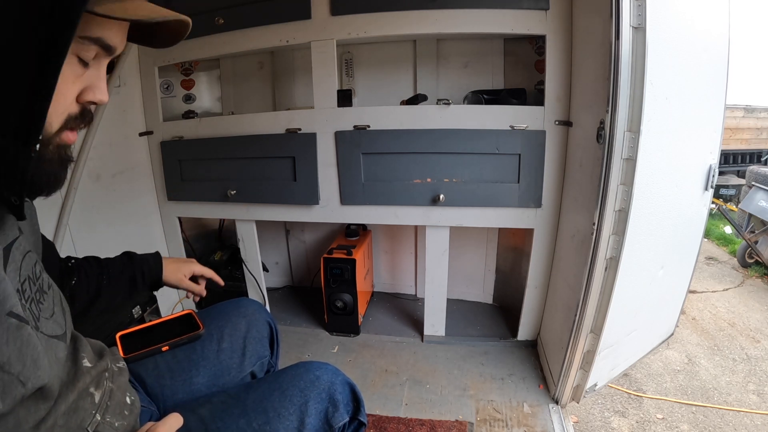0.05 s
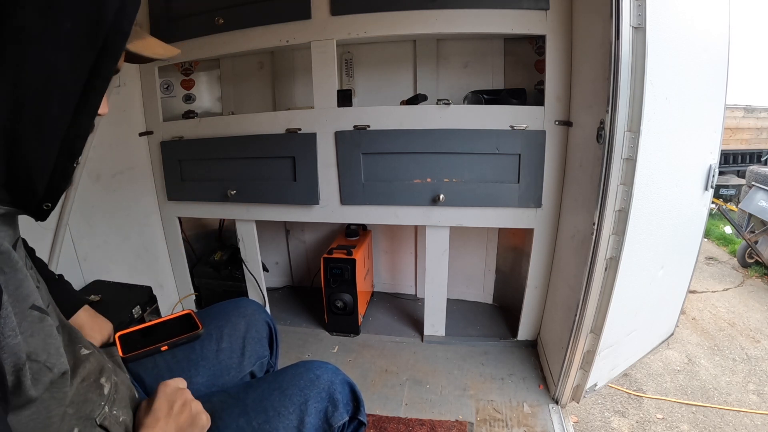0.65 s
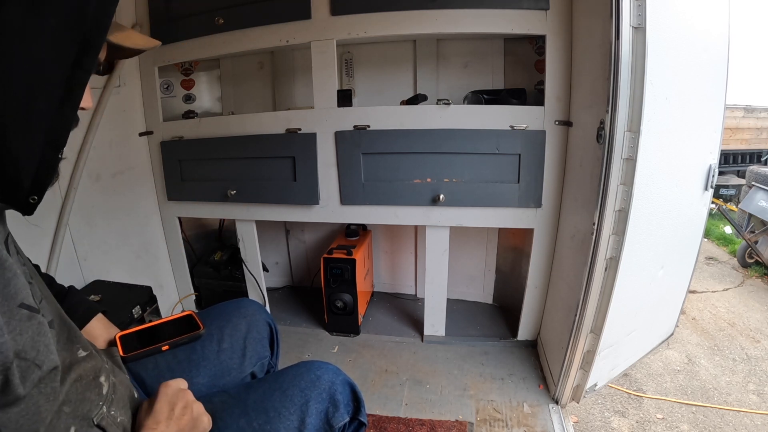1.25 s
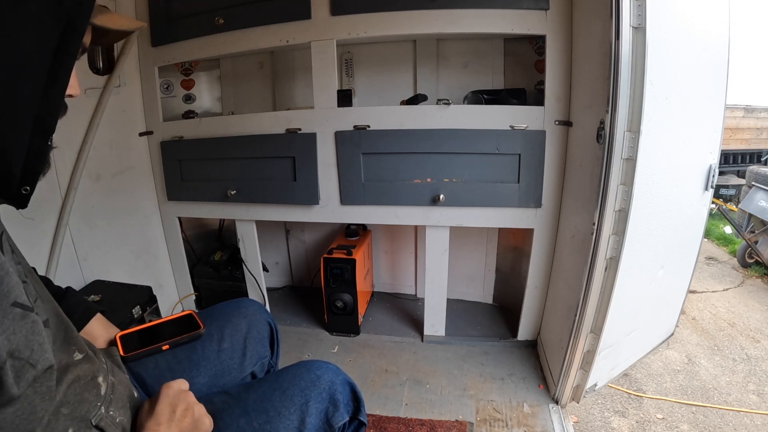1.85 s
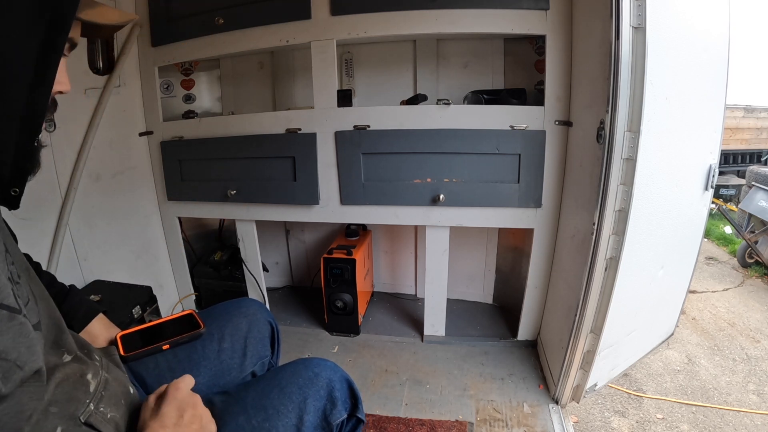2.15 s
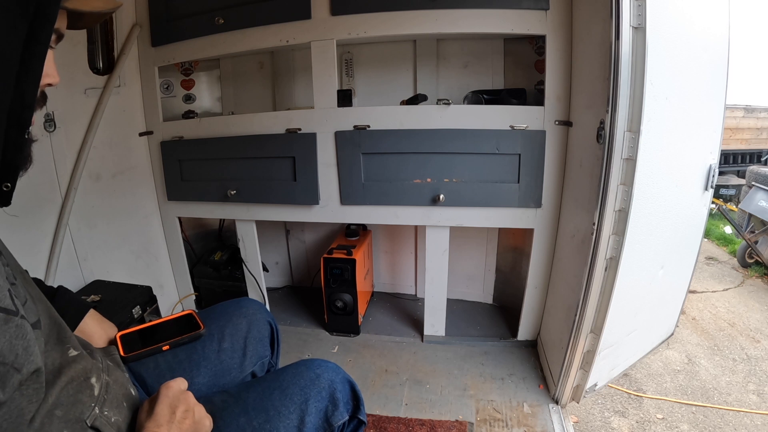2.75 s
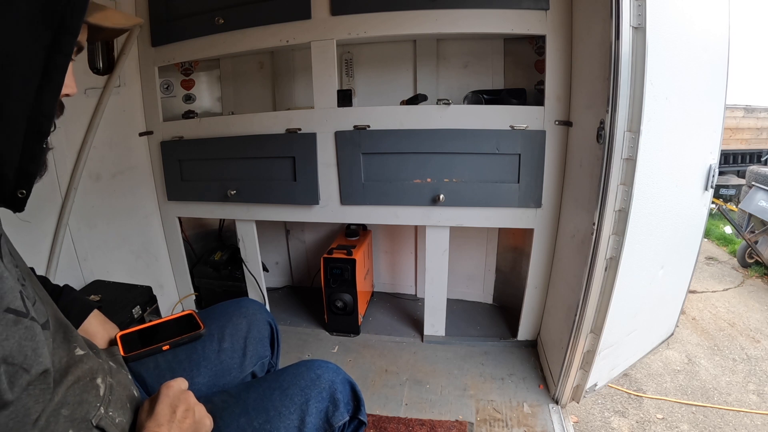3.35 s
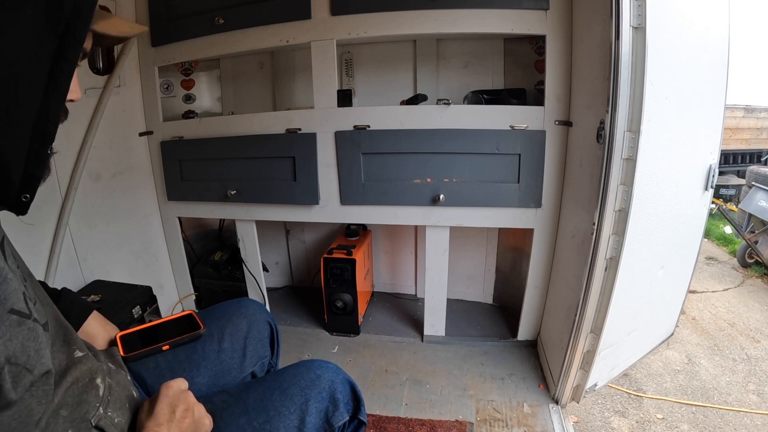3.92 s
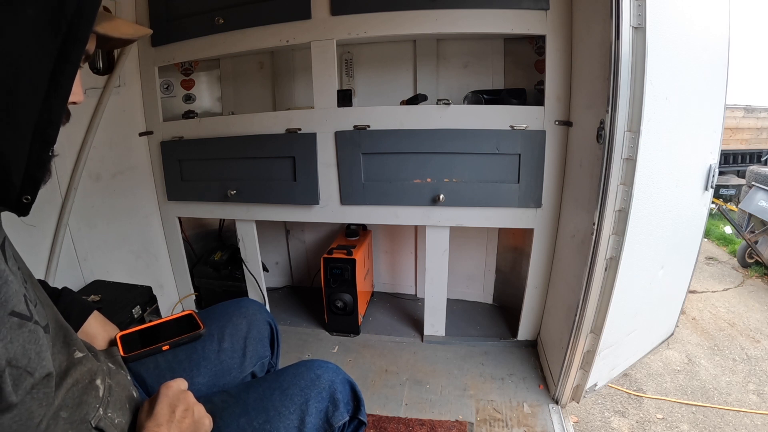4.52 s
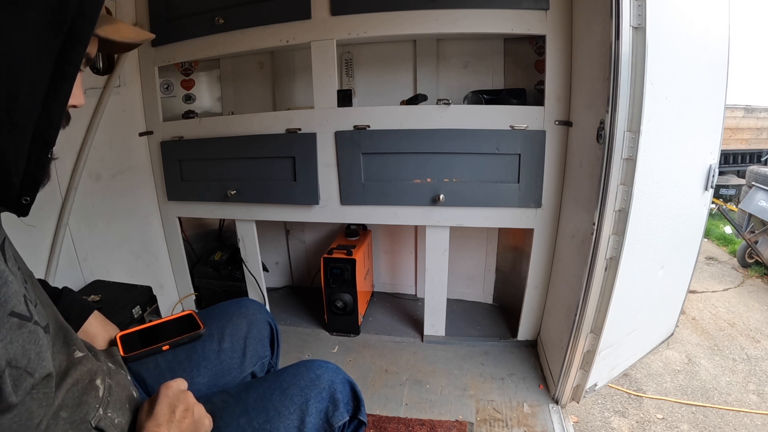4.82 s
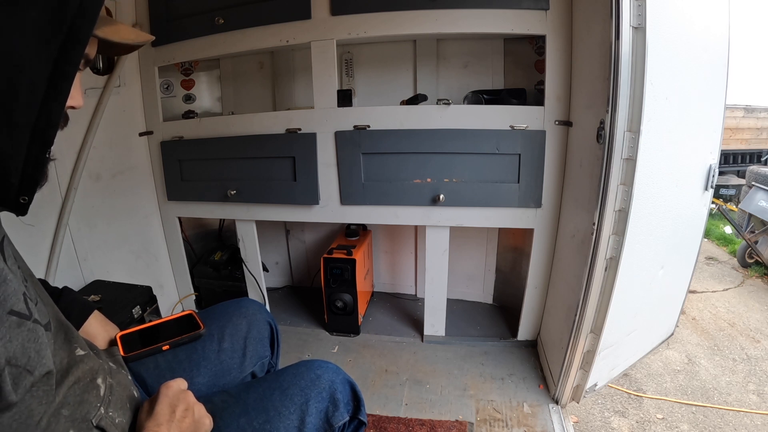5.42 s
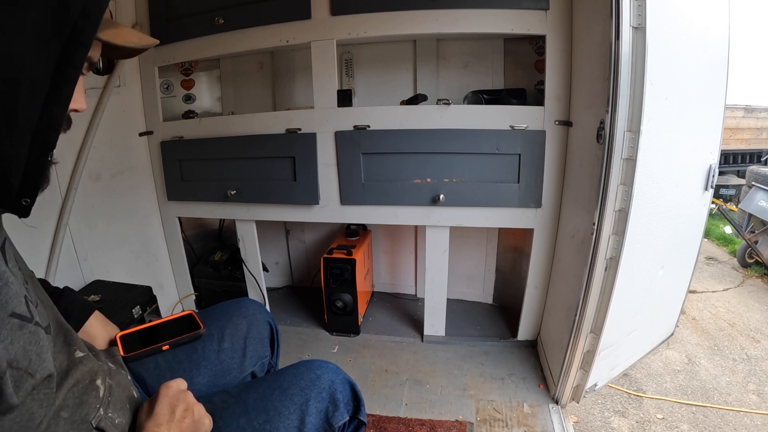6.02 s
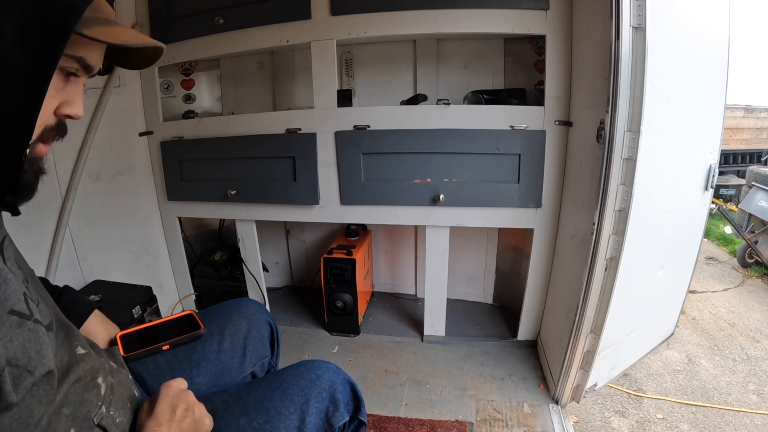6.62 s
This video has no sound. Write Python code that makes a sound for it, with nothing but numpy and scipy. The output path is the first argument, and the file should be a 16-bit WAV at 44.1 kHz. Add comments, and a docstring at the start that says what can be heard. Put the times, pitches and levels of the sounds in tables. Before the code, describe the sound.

Inside a small trailer, close to the microphone, a heater's fuel pump knocks in an even rhythm, each stroke a pair of metallic clicks with a short, boxy ring. Cloth rustles briefly, the knocks firm up a little, and a seated person makes a soft bump. The pace drops midway, another bump follows, and low outdoor rumble grows. A quiet fan and a very faint whine run throughout.

```python
"""The metering fuel pump of a diesel heater ticks through start-up on the floor of an enclosed trailer.
A faint tone dies away and the ticks begin over fan air, thin power-supply whine and outdoor rumble.
Each tick is two blows, the plunger pulling in and springing back: steel clacks, floor and walls boom.
A sleeve rustles, the blows firm up as the fuel line fills, and a seated person shifts with a soft bump.
Halfway the ticking slows; a second bump follows, and then the rumble swells."""
import sys
import numpy as np
from scipy import signal
from scipy.fft import rfft, irfft, next_fast_len
from scipy.io import wavfile
from scipy.ndimage import map_coordinates

SR = 44100
rng = np.random.default_rng(int(sys.argv[2]) if len(sys.argv) > 2 else 0)


def inscribe(sig):
    """Save sig as 16-bit PCM at rate SR to the path in sys.argv[1].

    A 1-D sig is mono; a 2-D sig holds one channel per row.
    Samples are clipped to [-1, 1] before scaling.
    """
    pcm = np.round(np.clip(np.atleast_2d(sig).T, -1, 1) * 32767)
    wavfile.write(sys.argv[1], SR, pcm.astype(np.int16))


N = 294147

# modes of heater case, floor and cabin: pitch_hz, pull_in_db, spring_back_db, t60_s (capped in boom)
BODY_MODES = [(98, -61.5, -53, 0.62), (127.15, -53, -78, 0.92), (144, -56.4, -65.5, 0.74),
              (165.4, -53, -76, 0.83), (185.2, -59.5, -71.5, 0.78), (196.3, -44, -71, 0.39),
              (210.46, -37, -34, 0.36), (236.2, -47.5, -43.5, 0.22), (250.9, -48.5, -47, 0.42),
              (286, -65, -65, 0.16), (305.8, -39.5, -36, 0.38), (308.8, -31.5, -33, 0.14),
              (341.3, -37, -60, 0.08), (344.5, -38.5, -32.5, 0.17), (378, -52.5, -42, 0.24),
              (407.1, -42.5, -44, 0.23), (425.2, -32, -68, 0.26), (425.6, -34, -44, 0.53),
              (456.4, -52, -45.5, 0.25), (489.7, -48, -48, 0.44), (533, -46, -45, 0.24),
              (554.2, -39.5, -37, 0.11), (564.9, -44.5, -50, 0.22), (604.8, -46, -59, 0.25),
              (623, -45.5, -54, 0.12), (667.6, -54.5, -52.5, 1), (682, -74, -60.5, 0.48)]


def amp(db):
    """Decibels to gain."""
    return 10 ** (np.asarray(db) / 20)


def unit(x):
    """Scale to rms 1."""
    return x / np.sqrt(np.mean(x ** 2) + 1e-20)


def along(points, hz):
    """(Hz, value) points on a log axis."""
    f, v = np.transpose(points)
    return np.interp(np.log(hz + 1), np.log(f + 1), v)


def curves(rows):
    """One value per sample for each column after the time."""
    s, *cols = np.transpose(rows)
    return [np.interp(np.arange(N) / SR, s, c) for c in cols]


def wobble(rate):
    """A smooth random curve, rate knots a second."""
    knots = rng.standard_normal(int(N * rate / SR) + 4)
    coarse = np.arange(0, N, 32)
    return np.interp(np.arange(N), coarse, map_coordinates(knots, [coarse * rate / SR]))


def filtered(x, response):
    """x times a complex response of frequency."""
    n = x.shape[-1]
    m = next_fast_len(n + SR // 4)
    return irfft(rfft(x, m) * response(np.fft.rfftfreq(m, 1 / SR)), m)[..., :n]


def causal(x, gain):
    """Colour x by a gain of frequency, with nothing ahead of the attack."""
    size = 2 ** 16
    cep = irfft(np.log(np.maximum(gain(np.fft.rfftfreq(size, 1 / SR)), 1e-6)))
    fold = 1 + np.sign(size // 2 - np.arange(size))
    fold[0] = 1
    return irfft(rfft(x, size) * np.exp(rfft(cep * fold)))[..., :x.shape[-1]]


def stereo_noise(n, alike):
    """White noise whose two channels agree as much as alike says."""
    turn = lambda hz: np.arccos(np.clip(along(alike, hz), -1, 1)) / 2
    mid, side = filtered(rng.standard_normal((2, n)),
                         lambda hz: np.array([np.cos(turn(hz)), np.sin(turn(hz))]))
    return np.array([mid + side, mid - side])


def rush(spectrum, alike):
    """Coloured stereo noise of rms 1."""
    return unit(filtered(stereo_noise(N, alike), lambda hz: amp(along(spectrum, hz))))


def add(track, s, sound):
    """Mix a sound into the track at time s."""
    part = track[:, max(round(s * SR), 0):][:, :sound.shape[-1]]
    part += sound[:, :part.shape[-1]]


def pump(clack_db=-31.5, boom_db=0.45, rattle=0.29, stroke_s=.05377, jitter_s=.0002, vary_db=.5):
    """The plunger pulls in and springs back: each blow is a steel clack over a low boom."""
    # the softer spring-back against the pull-in: freq_hz, gain_db
    softer = [(700, -2.5), (1500, -5.5), (2800, -4), (4500, -11.5), (7000, -15), (12000, -15)]
    strokes = ticks()
    _, pull_db, back_db, _ = np.transpose(BODY_MODES)
    pull_boom = boom(pull_db)
    back_boom = rocking(pull_boom.shape[-1]) - boom(back_db)  # the return kicks the case the other way
    pull_paths, back_paths = scatter(), scatter()  # the same at every tick, plus fresh rattle
    t = np.arange(back_paths.shape[-1]) / SR
    cushion = 1 - np.exp(-t / 0.00046)  # fuel brakes the returning plunger
    pulls = np.array([pull_paths + rattle * scatter() for _ in strokes])
    backs = np.array([cushion * (back_paths + rattle * scatter()) for _ in strokes])
    pulls = causal(pulls, clack_colour)
    backs = causal(backs, lambda hz: clack_colour(hz) * amp(along(softer, hz)))
    out = np.zeros((2, N))
    luck = rng.standard_normal((len(strokes), 2))
    for (s, low_db, high_db), (late, harder), pull, back in zip(strokes, luck, pulls, backs):
        back_s = s + stroke_s + jitter_s * late
        spring_db = vary_db * harder
        add(out, s, amp(high_db + clack_db) * pull)
        add(out, s, amp(low_db + boom_db) * pull_boom)
        add(out, back_s, amp(high_db + clack_db + spring_db) * back)
        add(out, back_s, amp(low_db + boom_db + spring_db) * back_boom)
    return out


def ticks(first_s=.0671, fill_s=1.75, empty_boom_db=-2.5, empty_clack_db=-1.5):
    """Strokes firm up as the fuel line fills. Rows of start_s, boom_gain_db, clack_gain_db."""
    # the controller steps the pump's pace: period_s, stroke_count
    pace = [(.3938, 9), (.5252, 2), (.4937, 2), (.4639, 2)]
    period_s, count = np.transpose(pace)
    start_s = first_s + np.append(0, np.cumsum(np.repeat(period_s, count.astype(int))))
    empty = np.clip(1 - start_s / fill_s, 0, 1)
    return np.column_stack([start_s, empty_boom_db * empty, empty_clack_db * empty])


def boom(levels_db, attack_s=0.00054, spread=0.22, life_cycles=180):
    """One blow rings case, floor and cabin; the walls echo it, and left and right differ in phase."""
    # echoes off the side and end walls: delay_s, gain
    walls = [(.01842, -.49), (.04113, .45)]
    t = np.arange(SR * 3 // 4) / SR
    hz, _, _, t60 = np.transpose(BODY_MODES)[:, :, None]
    t60 = np.minimum(t60, life_cycles / hz)  # plywood damps every mode within so many cycles
    sign = (-1) ** np.arange(len(hz))[:, None]  # neighbouring modes swing opposite ways
    fade = sign * amp(levels_db[:, None] - 60 * t / t60) * (1 - np.exp(-t / attack_s))
    ring = np.sum(fade * np.sin(2 * np.pi * hz * t), axis=0)
    mid = filtered(ring, lambda f: 1 + sum(gain * np.exp(-2j * np.pi * f * s) for s, gain in walls))
    skew = spread * hz / np.mean(hz) * rng.choice([-1, 1], hz.shape)
    side = filtered(mid, lambda f: 1j * np.interp(f, np.sort(hz[:, 0]), skew[:, 0]))
    return np.array([mid + side, mid - side])


def clack_colour(hz):
    """Left and right gains of the hard clack, lifted where the steel pump body resonates."""
    # spectrum of the pull-in: freq_hz, relative_db
    clack_eq = [(300, -51.5), (520, 4.5), (760, 0.5), (1000, 1), (1250, 4), (1900, 2.5), (2400, -3),
                (3000, -6), (3900, -5.5), (5300, -14), (6500, -11), (10000, -13.5), (12000, -21.5),
                (15000, -35)]
    # resonances of the pump body: centre_hz, width_hz, strength_db
    steel = [(3750, 59, -13), (7260, 300, 1), (7580, 180, 5.5)]
    # the treble leans left: freq_hz, left_minus_right_db
    lean = [(1000, -0.2), (2200, 2), (4500, -0.2), (8000, 1.5), (12000, 3.5)]
    ring = 1 + sum(amp(db) / (1 + (2 * (hz - centre) / width) ** 2) for centre, width, db in steel)
    return amp(along(clack_eq, hz) + np.outer([.5, -.5], along(lean, hz))) * ring


def scatter():
    """The dense reflections of one blow: part arrives at once, the panels bloom, the treble dies first."""
    # stereo image: freq_hz, left_right_likeness
    alike = [(600, 0.65), (1200, 0.8), (2200, .7), (4000, 0.73), (7500, 1), (12000, 0.53)]
    # sound that arrives at once: freq_hz, share
    direct_share = [(1200, 0.078), (3500, 0.44)]
    # the case panels take time to radiate: freq_hz, rise_s
    panel_rise = [(500, 0.012), (1500, 0.0087), (3000, 0.02), (7000, 0.0026), (12000, .001)]
    # decay in the cabin: freq_hz, t60_s
    cabin_decay = [(700, 0.3), (1500, 0.23), (3000, 0.22), (7000, 0.21), (12000, 0.13)]
    hz, t, grains = signal.stft(stereo_noise(SR // 2, alike), SR, nperseg=256)
    direct = np.clip(along(direct_share, hz), 0, 1)[:, None]
    bloom = 1 - (1 - direct) * np.exp(-t / along(panel_rise, hz)[:, None])
    fade = amp(-60 * t / along(cabin_decay, hz)[:, None])
    return signal.istft(grains * bloom * fade, SR, nperseg=256)[1]


def rocking(n, attack_s=0.0012):
    """The heater case rocks back on its feet with two dull knocks."""
    # knocks after the spring-back: delay_s, pitch_hz, relative_db, t60_s
    case_knocks = [(0.0345, 465.4, -33, 0.083), (0.0523, 388.6, -32, 0.089)]
    out, t = np.zeros((2, n)), np.arange(n) / SR
    for s, hz, db, t60 in case_knocks:
        knock = amp(db - 60 * t / t60) * (1 - np.exp(-t / attack_s)) * np.sin(2 * np.pi * hz * t)
        add(out, s, knock[None])
    return out


def bracket_ping(attack_s=0.0073, vary_db=2.5):
    """Each pull-in rings the steel mounting bracket with a slightly new balance of modes."""
    # bracket modes: pitch_hz, level_db, t60_s
    bracket = [(1210, -52, 0.34), (1279, -56.5, 0.34), (1428, -65, 0.26), (1956, -54, 0.23),
               (2924, -60, 0.31), (3680, -65, 0.17), (7620, -63, 0.22), (9900, -53.5, 0.11)]
    out, t = np.zeros((2, N)), np.arange(SR // 3) / SR
    hz, db, t60 = np.transpose(bracket)[:, :, None]
    modes = amp(db - 60 * t / t60) * np.sin(2 * np.pi * hz * t) * (1 - np.exp(-t / attack_s))
    strokes = ticks()
    for (s, _, high_db), luck in zip(strokes, rng.standard_normal((len(strokes), len(bracket)))):
        add(out, s, (amp(high_db + vary_db * luck) @ modes)[None])
    return out


def floor_bumps(rise_s=0.0093, width=0.24):
    """A seated person shifts; each soft bump rings the floor in one narrow band."""
    # bumps: start_s, centre_hz, level_db, t60_s
    shifts = [(1.73, 98, -38.5, 0.28), (3.813, 290, -42, 0.12)]
    out, t = np.zeros((2, N)), np.arange(SR // 2) / SR
    for s, hz, db, t60 in shifts:
        push = rng.standard_normal((1, len(t)))
        band = unit(filtered(push, lambda f: np.exp(-((f / hz - 1) / width) ** 2)))
        add(out, s, band * amp(db - 60 * t / t60) * (1 - np.exp(-t / rise_s)))
    return out


def sleeve(rise_share=0.52, edge_drop_db=14.5, grain_db=2):
    """A sleeve rubs a jacket in fine grains, swelling and fading as the arm speeds up and slows."""
    # arm strokes: peak_s, level_db, length_s
    arm_strokes = [(.15, -68.5, 0.47), (0.516, -59.5, 0.28), (.8, -77, .45), (2.084, -72.5, 0.37)]
    # spectrum of rubbing cloth: freq_hz, relative_db
    cloth_eq = [(150, -60), (400, -15), (900, -1.5), (1400, 4), (2400, 1.5), (4000, 0), (5300, -10.5),
                (7200, 4), (8800, -10), (11000, -11), (15000, -27)]
    t = np.arange(N) / SR
    power = np.zeros(N)
    for s, db, length_s in arm_strokes:
        from_peak = np.maximum((s - t) / rise_share, (t - s) / (1 - rise_share)) / length_s
        power += amp(db - edge_drop_db * from_peak ** 2) ** 2
    grain = amp(grain_db * wobble(150))
    return np.sqrt(power) * grain * rush(cloth_eq, alike=[(1000, 0.66), (8000, 0.96)])


def fading_tone(hz=477, db=-45, t60=0.18, end_s=0.058, release_s=0.013):
    """A faint tone dies away just before the first tick."""
    t = np.arange(N) / SR
    return amp(db - 60 * t / t60) * np.clip((end_s - t) / release_s, 0, 1) * np.sin(2 * np.pi * hz * t)


def outdoor_rumble(gain_db=1, lumps_db=3.0):
    """Uneven rumble rolls in through the open door."""
    # rumble spectrum: freq_hz, relative_db
    rumble_eq = [(12, -6.5), (22, -2.5), (35, 3), (55, -3), (75, -7.5), (102, -0.5), (140, -17), (220, -34),
                 (500, -120)]
    # its swell, before gain_db: time_s, level_db
    level_ride = [(0.0, -69), (0.63, -63), (4.45, -61.5), (4.54, -57), (6.5, -57.5)]
    return amp(curves(level_ride)[0] + gain_db + lumps_db * wobble(6)) * rush(rumble_eq, [(50, 0.98)])


def heater_fan(air_db=-65.5, rise_db_per_s=0.4, waver_db=0.95):
    """The slow fan's air gradually grows louder, and the case panels it stirs hum unsteadily."""
    # spectrum of the moving air: freq_hz, relative_db
    air_eq = [(60, -58), (130, -6.5), (250, -3), (450, -13.5), (750, -19), (1400, -22.5), (2300, -34),
              (3500, -37), (4600, -40.5), (5500, -48), (7200, -37), (9500, -45), (12000, -50.5),
              (15500, -61)]
    # stereo image: freq_hz, left_right_likeness
    alike = [(60, 0.33), (180, 0.75), (550, 0.81), (1650, 0.44), (4970, 0.79), (15000, 0.76)]
    # panel hum: pitch_hz, level_db
    panels = [(210, -71.5), (296, -71.5), (495, -87.5)]
    t = np.arange(N) / SR
    air = amp(air_db + rise_db_per_s * t) * rush(air_eq, alike)
    hum = sum(amp(db + waver_db * wobble(3.8)) * np.sin(2 * np.pi * hz * t + wobble(9.4))
              for hz, db in panels)
    return air + np.sqrt(2) * hum


def supply_whine(switch_hz=995.4, change_s=1.12, crossfade_s=0.19):
    """The pulsed supply sings at multiples of its switching rate; their mix shifts with pulse width."""
    # partials around the change of pulse width: harmonic, before_db, after_db
    whine_mix = [(1, -86, -84.5), (2, -100, -95), (3, -102, -99), (5, -108, -87.5), (6, -88, -86.5),
                 (7, -104, -104), (8, -106, -102), (9, -110, -98.5), (10, -104, -102), (11, -93, -104),
                 (13, -102, -115)]
    t = np.arange(N) / SR
    blend = np.clip((t - change_s) / crossfade_s + .5, 0, 1)
    phase = 2 * np.pi * switch_hz * t + 0.034 * wobble(6)
    return np.sqrt(2) * sum(((1 - blend) * amp(before_db) + blend * amp(after_db)) * np.sin(k * phase)
                            for k, before_db, after_db in whine_mix)


def scene():
    """Everything heard from a seat on the trailer floor."""
    ticking = pump() + bracket_ping()
    backdrop = outdoor_rumble() + heater_fan() + supply_whine()
    return ticking + backdrop + sleeve() + floor_bumps() + fading_tone()


def record(dry):
    """A brick-wall high cut at 15.5 kHz."""
    return filtered(dry, lambda hz: hz < 15500)


dry = scene()
out = record(dry)
inscribe(out)
```